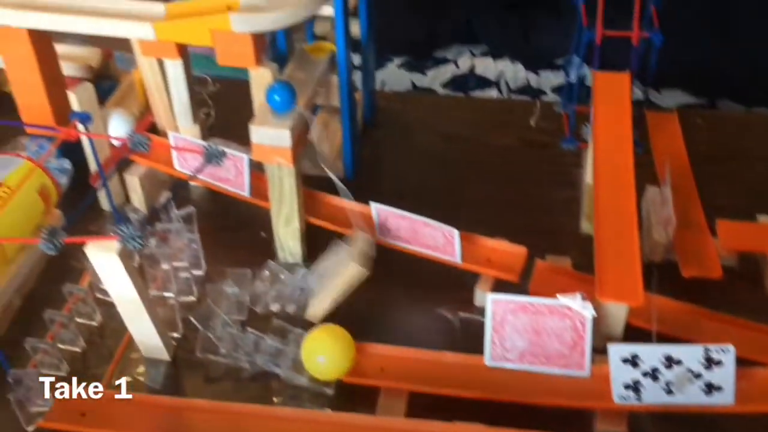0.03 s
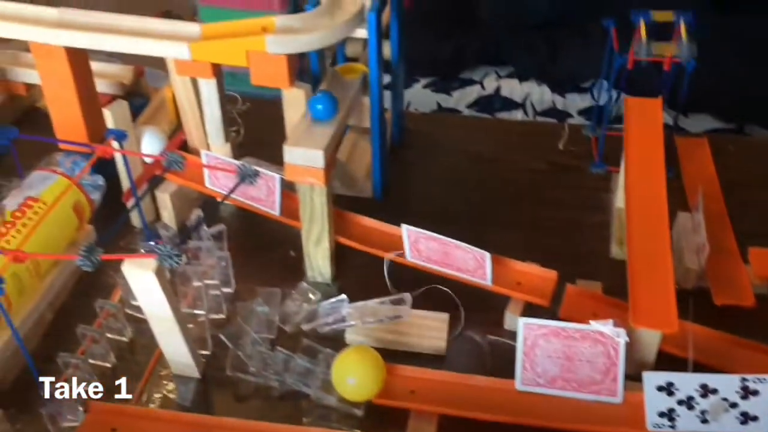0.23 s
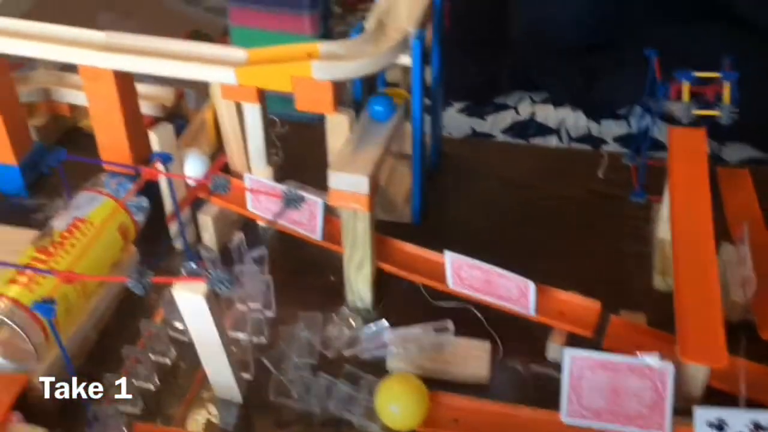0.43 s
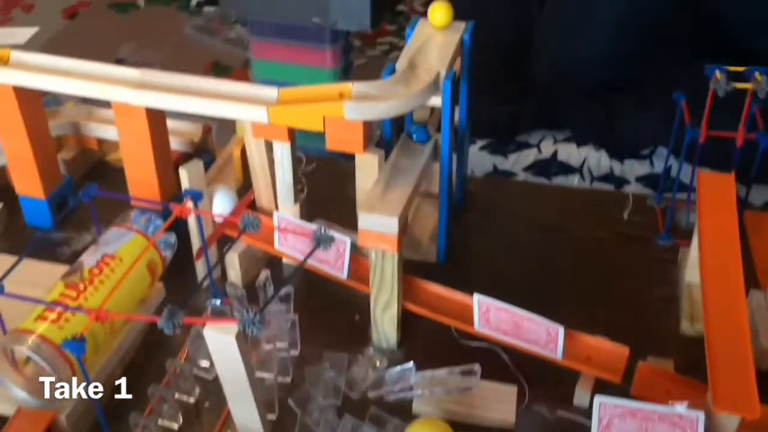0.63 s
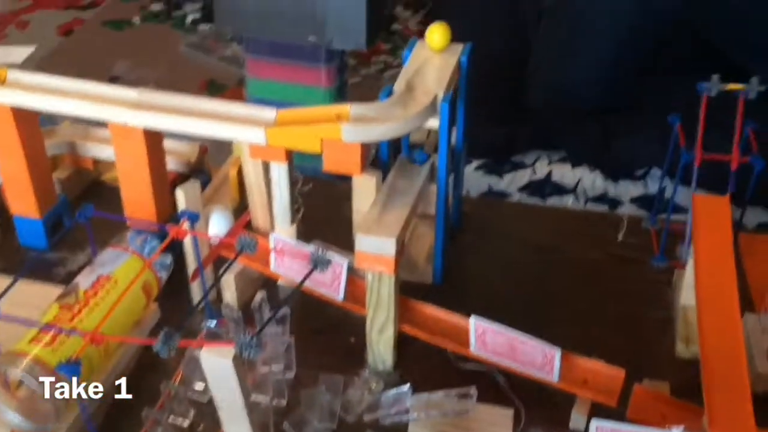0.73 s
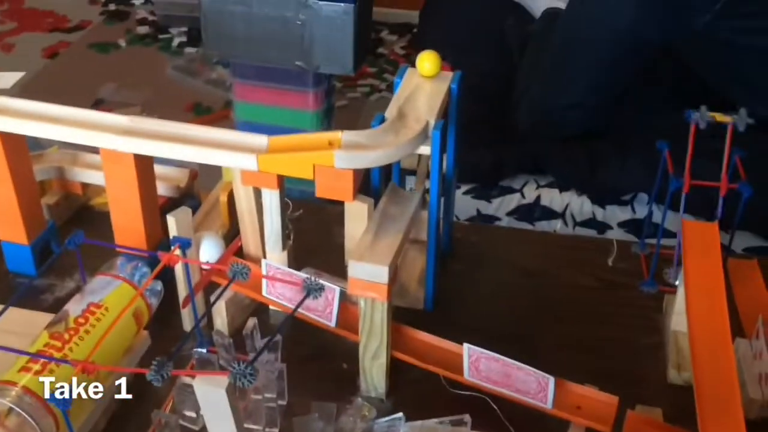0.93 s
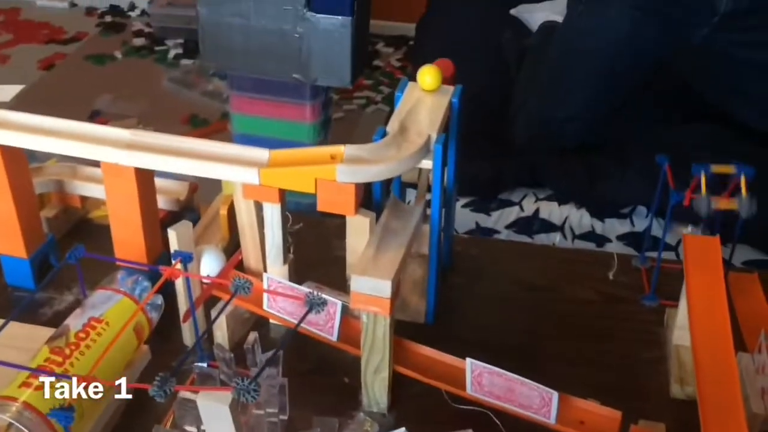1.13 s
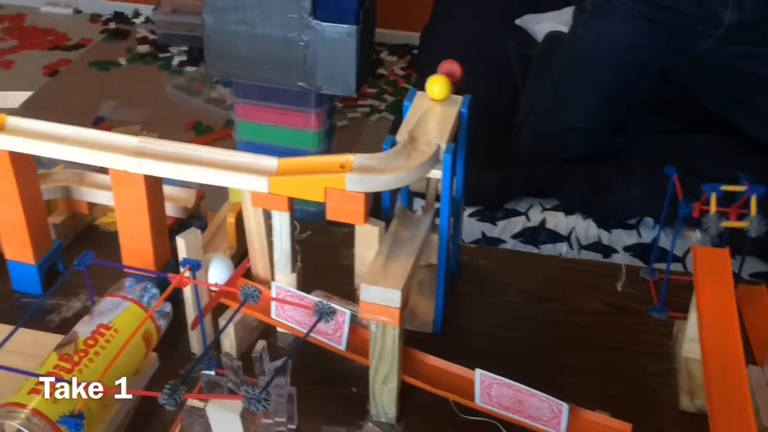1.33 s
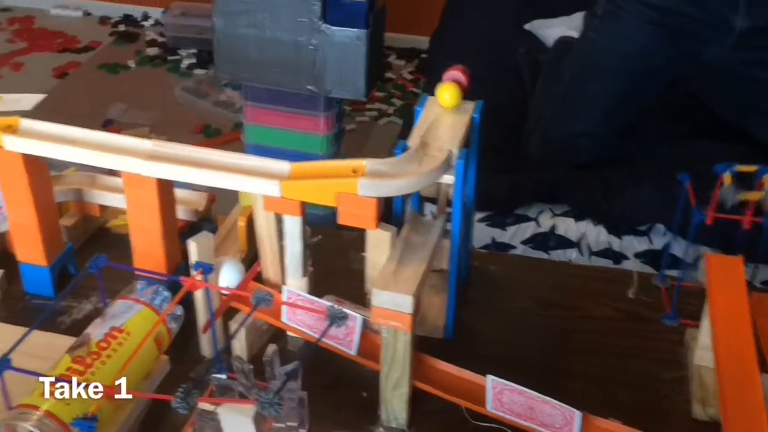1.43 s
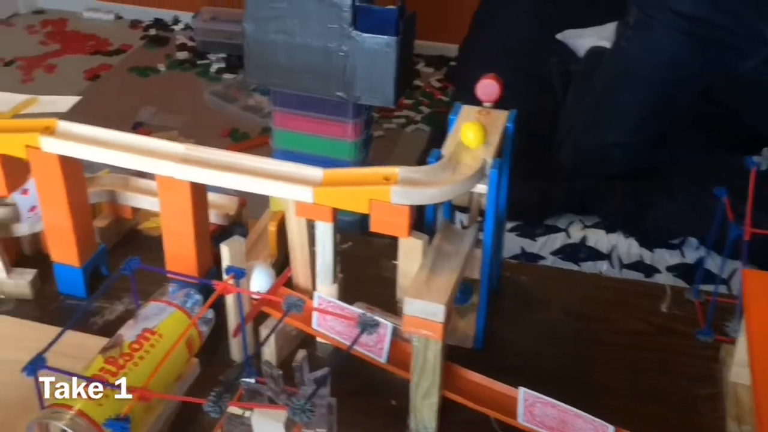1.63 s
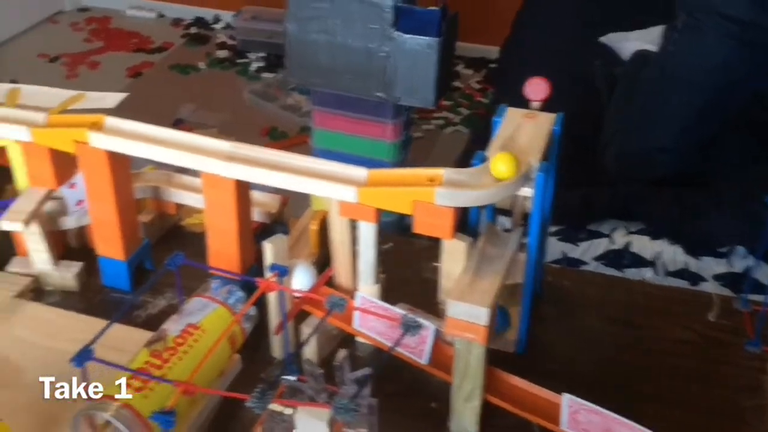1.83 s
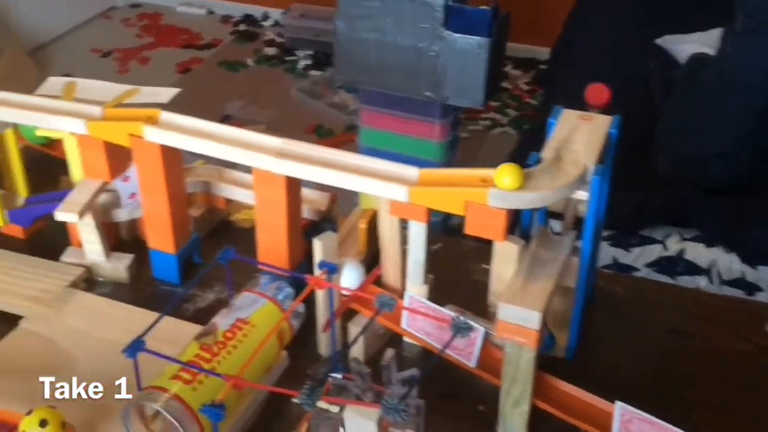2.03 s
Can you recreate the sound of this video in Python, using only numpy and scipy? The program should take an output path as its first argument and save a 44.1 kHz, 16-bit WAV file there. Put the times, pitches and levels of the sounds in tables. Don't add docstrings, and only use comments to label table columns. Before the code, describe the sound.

Homemade ball machine clatters: a wood block slaps flat, an arm rattles, a ball rolls on track

```python
import sys
import numpy as np
from scipy import signal
from scipy.fft import rfft, irfft
from scipy.io import wavfile

SR = 44100
rng = np.random.default_rng(int(sys.argv[2]) if len(sys.argv) > 2 else 0)


def linear_from_db(decibels):
    return 10 ** (np.asarray(decibels, float) / 20)


def generate_wav(sig):
    pcm = np.round(np.clip(np.atleast_2d(sig).T, -1, 1) * 32767).astype(np.int16)
    wavfile.write(sys.argv[1], SR, pcm)


N = 92610
SIZE = 2 ** 17

# [t/s, level/dB]
FAR_ROLL = [(.44, -55.5), (0.496, -54), (0.562, -44), (.6, -53.5), (0.644, -55)]


def slope(hz, table):
    f, v = np.array(table, float).T
    return np.interp(np.log(hz + 1), np.log(f), v)


def colour(table):
    log_gain = slope(np.fft.rfftfreq(SIZE, 1 / SR), table) * np.log(10) / 20
    cepstrum = irfft(log_gain)
    cepstrum[1:SIZE // 2] *= 2
    cepstrum[SIZE // 2 + 1:] = 0
    return np.exp(rfft(cepstrum))


def rings(modes, gain_db):
    f = np.fft.rfftfreq(SIZE, 1 / SR)
    total = 0
    for k, (hz, width_hz, db) in enumerate(modes):
        damping = 1j * f * width_hz
        total = total + (-1) ** k * linear_from_db(db + gain_db) * damping / (hz ** 2 - f ** 2 + damping)
    return total


def strikes(hits, edge_hz, chatter_db, chatter_s):
    flat, treble = trains = np.zeros((2, N))
    for s, db, treble_db in hits:
        trains[:, int(s * SR)] += linear_from_db(db) * np.array([1, linear_from_db(treble_db) - 1])
    fade = np.exp(-1 / (chatter_s * SR))
    trains += signal.lfilter([linear_from_db(chatter_db)], [1, -fade], trains) * rng.standard_normal(N)
    return flat + treble - signal.lfilter(*signal.butter(1, edge_hz, fs=SR), treble)


def rolling(curve, rate, spread_db):
    t = np.arange(N) / SR
    s, db = np.array(curve, float).T
    bump = rng.random(N) < rate / SR
    size = np.minimum(rng.exponential(size=N), 2.2)
    clicks = bump * np.sign(rng.standard_normal(N)) * linear_from_db(spread_db * size)
    strength = linear_from_db(np.interp(t, s, db, left=-200, right=-200))
    return clicks / np.sqrt(np.mean(clicks ** 2)) * strength


def part(hits, roll, body, modes, mode_db, chatter_db, chatter_s, rate, spread_db, edge_hz=5000):
    soft = signal.lfilter(*signal.butter(1, 5560, fs=SR), rolling(roll, rate, spread_db))
    force = strikes(hits, edge_hz, chatter_db, chatter_s) + 0.15 * soft
    shape = colour(body) + rings(modes, mode_db)
    return irfft(rfft(force, SIZE) * shape / np.abs(irfft(shape)).max())[:N]


def wood_block():
    # [t/s, level/dB, treble/dB]
    hits = [
        (.2104, -1.5, 14),
        (.216, -16.5, -4),
        (.2195, -8.5, -4),
        (.223, -8, -3),
        (.2285, -2.5, -6.5),
        (.2335, -5, -4),
        (.238, -5.5, -5),
        (.2435, -7, -7.5),
        (.293, -14.5, -16),
    ]
    # [t/s, level/dB]
    roll = [(0.213, -10), (0.248, -22.5), (.28, -26), (.34, -36.5), (0.398, -50)]
    # [f/Hz, level/dB]
    body = [(29, -58), (50, -22), (153, -5.5), (518, -7.5), (1140, -1.5), (1350, -1.5), (1630, -2),
            (2450, 1), (15000, -52.5)]
    # [f/Hz, width/Hz, level/dB]
    modes = [(1314, 39, -11.5), (1003, 110, 2.5), (1555, 146.4, -6.5), (1870, 69, -6), (1600, 33, -13),
             (2220, 98, -4.5), (3165, 210, -3), (4480, 77, -21), (5730, 100, -24.5)]
    return part(hits, roll, body, modes, 1.3, -19.0, 0.0027, 3500, 4.0)


def hard_ball():
    # [t/s, level/dB, treble/dB]
    hits = [
        (.1798, -26, -1.5),
        (.1816, -6.5, -4.5),
        (.274, -30, -1),
    ]
    # [f/Hz, level/dB]
    body = [(59, -38.5), (100, -4), (780, -12.5), (1100, -14), (2230, -2.5), (3610, -9), (7350, -7.5),
            (8700, -11.5), (15000, -20.5)]
    # [f/Hz, width/Hz, level/dB]
    modes = [(2380, 670, -6.5), (4260, 300, -2.5), (5550, 300, -10), (7800, 150, -4.5), (8920, 200, -5),
             (14200, 2000, -4.5)]
    # [t/s, level/dB]
    roll = [(.14, -70.5), (.152, -56), (.178, -45), (.182, -38), (.21, -43.5)]
    return part(hits, roll, body, modes, 3.0, -10, 0.00086, 1500, 2.3)


def arm():
    # [t/s, level/dB, treble/dB]
    hits = [(.6492, -24, 2.5), (.663, -22.5, -19), (.677, -24, -12), (.6915, -27, 4), (.698, -37, 6),
            (.709, -31, -6), (.753, -33, -19), (.869, -53, 0), (.918, -49, -9), (1.4855, -16, -13),
            (1.492, -15.5, -15.5), (1.504, -27.5, -10), (1.523, -26, 3.5), (1.53, -25, -24),
            (1.547, -39, -2)]
    # [t/s, level/dB]
    roll = [(0.648, -31), (.72, -32), (0.761, -51), (0.899, -84), (0.949, -120), (1.463, -84), (1.482, -49),
            (1.487, -54), (1.53, -35.5), (1.62, -63)]
    # [f/Hz, level/dB]
    body = [(100, -21), (600, 1.5), (1350, -10.5), (2300, 2), (4500, -1), (5600, -18.5), (9000, -27.5),
            (15000, -41)]
    # [f/Hz, width/Hz, level/dB]
    modes = [(1357, 7.7, 9), (2052, 69, 8.5), (2250, 98, 8), (2440, 93, 4), (3607, 72, 5.5),
             (4000, 340, -20), (4680, 120, -2.5), (5710, 48, -17)]
    return part(hits, roll, body, modes, 3.83, -19, 0.0054, 2500, 2.6)


def plank():
    # [t/s, level/dB, treble/dB]
    hits = [
        (.65, -30, -27),
        (.692, -29, 3),
        (.753, -29.5, -12),
        (.768, -27.5, -2),
        (.797, -30, 3),
        (.816, -37.5, 3),
        (.83, -43, 6),
        (1.493, -25, -28),
        (1.517, -18.5, -13),
        (1.545, -25, -32),
    ]
    # [t/s, level/dB]
    roll = [(0.651, -32), (0.762, -33.5), (0.839, -40), (0.919, -46), (1.002, -72), (1.05, -105),
            (1.5, -68), (1.518, -38), (1.579, -40), (1.66, -90)]
    # [f/Hz, level/dB]
    body = [(40, -46), (150, -17), (290, -9.5), (500, -3.5), (1800, 0), (4800, -27), (6000, -33.5),
            (15000, -52)]
    # [f/Hz, width/Hz, level/dB]
    modes = [(174, 110, -2), (377, 49, 2.5), (610, 16, -11), (897, 26.7, 6.5), (1427, 14, -8),
             (1787, 22, 3), (1905, 30, -2.5)]
    return part(hits, roll, body, modes, 4.67, -14.5, 0.0094, 2500, 2.8, 730)


def plastic_track():
    # [t/s, level/dB, treble/dB]
    hits = [(1.6808, -18, -7), (1.6935, -22.5, 8), (1.699, -26, -10), (1.7055, -22, -20),
            (1.712, -22.5, -21), (1.742, -26.5, -10), (1.758, -26, -8), (1.766, -27.5, -14),
            (1.8035, -20, -2), (1.819, -24.5, 3), (1.829, -26.5, 12), (1.858, -25, 1), (1.878, -26, -18),
            (1.9, -35, 0), (1.961, -30, -2)]
    # [t/s, level/dB]
    roll = [(1.684, -28), (1.719, -29.5), (1.782, -36.5), (1.81, -32), (1.87, -31), (1.959, -29.5),
            (1.999, -40.5), (2.051, -66), (2.1, -79)]
    # [f/Hz, level/dB]
    body = [(40, -28), (140, -13), (500, -16), (1200, -1.5), (2500, -7.5), (4300, -20), (7000, -37.5),
            (15000, -60.5)]
    # [f/Hz, width/Hz, level/dB]
    modes = [(350, 132, -6.5), (490, 220, -3.5), (866, 98, -1.5), (1118, 173, 0), (1499, 38, 4),
             (2420, 64, -20), (3710, 370, -14), (6900, 530, -39)]
    return part(hits, roll, body, modes, 1.84, -13.5, 0.0049, 3000, 11.0)


def track_joints():
    # [t/s, level/dB, treble/dB]
    hits = [
        (1.8035, -46, 0),
        (1.846, -39.5, 0),
        (1.858, -41, 0),
        (1.9, -54, 0.0091),
    ]
    # [t/s, level/dB]
    roll = [(1.803, -32), (1.84, -44), (1.89, -57), (1.96, -68)]
    # [f/Hz, level/dB]
    body = [(2000, -33), (6500, -8), (15000, -31)]
    # [f/Hz, width/Hz, level/dB]
    modes = [(6330, 850, 8), (7900, 200, -6), (11200, 600, -11)]
    return part(hits, roll, body, modes, 3, -15, .003, 3000, 2.3)


def latch():
    # [t/s, level/dB, treble/dB]
    hits = [
        (.7531, -26, -8),
        (.7955, -33.5, -3.5),
        (1.6928, -22.5, -4),
        (1.8035, -19.5, 2),
        (1.8988, -37, 5),
        (1.9592, -41, 3),
    ]
    # [t/s, level/dB]
    roll = [(.752, -46), (.8, -48), (.85, -64), (.92, -70.5), (.95, -77)]
    # [f/Hz, level/dB]
    body = [(500, -42), (2500, -30), (4500, -14), (7000, -25), (15000, -63)]
    # [f/Hz, width/Hz, level/dB]
    modes = [(3220, 320, -1.5), (4050, 340, 3), (4595, 110, -1.5), (4780, 59, -13)]
    return part(hits, roll, body, modes, 3.7, -16, 0.0025, 2500, 2.8)


def thin_rods():
    # [t/s, level/dB, treble/dB]
    hits = [
        (.6493, -57, 0),
        (.663, -40, 0.0066),
        (.6902, -42, 0),
        (.811, -61, 0),
        (.869, -58.5, 0),
        (1.486, -52, 0),
        (1.495, -60, 0),
        (1.521, -58, 0),
        (1.546, -59, 0),
    ]
    # [t/s, level/dB]
    roll = [(.66, -48), (.7, -47), (.75, -77), (.77, -110), (1.47, -110), (1.49, -55), (1.6, -62)]
    # [f/Hz, level/dB]
    body = [(2000, -45), (7000, -25), (10000, -21), (15000, -22)]
    # [f/Hz, width/Hz, level/dB]
    modes = [(7960, 110, -1.5), (8180, 260, 0.5), (9316, 120, 6.5), (10570, 120, -4), (11900, 110, -11),
             (14450, 500, -5.5)]
    return part(hits, roll, body, modes, 3, -15, 0.0055, 2500, 2.5)


def far_chute_walls():
    # [f/Hz, level/dB]
    body = [(150, -16), (450, -10), (900, -11.5), (2100, -22.5), (4200, -27), (8000, -69)]
    # [f/Hz, width/Hz, level/dB]
    modes = [(470, 53, -4), (1970, 350, -19.5), (3730, 300, -24.5)]
    return part([(.5635, -33.5, 6.7)], FAR_ROLL, body, modes, 3.5, -18, 0.0024, 1900, 3.5, 1460)


def far_chute_air():
    # [t/s, f/Hz]
    pitch = [
        (.46, 430),
        (.6, 530),
    ]
    width_hz = 45
    hz = np.interp(np.arange(N) / SR, *np.array(pitch, float).T)
    turn = np.exp(2j * np.pi * np.cumsum(hz) / SR)
    lowered = rolling(FAR_ROLL, 1900, 1.5) / turn
    ring = (signal.lfilter(*signal.butter(1, width_hz / 2, fs=SR), lowered) * turn).real
    return linear_from_db(-4.5) * ring * np.sqrt(SR / width_hz / 2)


def early_roll():
    # [t/s, level/dB]
    roll = [(0, -44), (.05, -45.5), (.1, -64.5), (.15, -55.5), (.178, -43.5)]
    # [f/Hz, level/dB]
    body = [(200, -10), (700, -8.5), (2200, -11), (5000, -19.5), (7000, -25.5), (15000, -28.5)]
    # [f/Hz, width/Hz, level/dB]
    modes = [(714, 120, -7.5), (5800, 260, 1)]
    return part([], roll, body, modes, 0.1, -20, .004, 4500, 1.7)


def late_knocks():
    # [t/s, level/dB, treble/dB]
    hits = [
        (1.25, -54, 11),
        (1.3, -56, 0),
        (1.4, -55.5, -5),
        (1.44, -56, -1),
    ]
    # [t/s, level/dB]
    roll = [(1.199, -70), (1.26, -74), (1.481, -65)]
    # [f/Hz, level/dB]
    body = [(150, -2), (450, 3.5), (800, -15), (3000, -42)]
    return part(hits, roll, body, [], 0, -17.5, 0.011, 3200, 5.3)


def floor_boards(near):
    # [f/Hz, width/Hz, level/dB]
    modes = [(137, 29, -2.5), (178, 5.4, 1), (200.6, 14, -6)]
    return irfft(rfft(near, SIZE) * rings(modes, 4.2))[:N]


def room(near):
    # [f/Hz, t/s]
    fade_time = [(125, 0.45), (500, 0.37), (2000, 0.34), (6000, 0.27), (14000, 0.22)]
    t = np.arange(SR // 2) / SR
    tail = 0
    for hz in 63 * 2. ** np.arange(8):
        top_hz = hz * np.sqrt(2) ** (1 + (hz > 8000))
        band_filter = signal.butter(2, [hz / np.sqrt(2), top_hz], "band", fs=SR, output="sos")
        band = signal.sosfilt(band_filter, rng.standard_normal(len(t)))
        tail = tail + band * linear_from_db(-60 * t / slope(hz, fade_time))
    tail = tail * np.clip(t / 0.00043, 0, 1) ** 2
    return linear_from_db(-8.5) * signal.fftconvolve(near, tail / np.sqrt(np.sum(tail ** 2)))[:N]


def hum():
    # [f/Hz, level/dB]
    spectrum = [(12, -39), (20, -10), (61, -4.5), (123, -5), (158, -4), (234, -17), (678, -29),
                (13900, -43.5), (16000, -58.5)]
    x = irfft(rfft(rng.standard_normal(SIZE)) * colour(spectrum))[:N]
    return x * linear_from_db(-60) / np.std(x)


def scene():
    near = wood_block() + hard_ball() + arm() + plank() + plastic_track() + track_joints()
    near = near + latch() + thin_rods() + far_chute_walls() + far_chute_air()
    near = near + early_roll() + late_knocks()
    return (near + room(near) + floor_boards(near) + hum())[None]


def low_pass(x):
    return signal.sosfilt(signal.butter(12, 16470, fs=SR, output="sos"), x)


def record(dry):
    rounded = .95 * np.tanh(dry / .95)
    mix = signal.sosfilt(signal.ellip(8, .2, 45, 15400, fs=SR, output="sos"), rounded)
    return low_pass(mix)


dry = scene()
out = record(dry)
generate_wav(out)
```